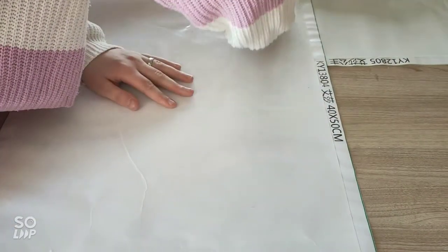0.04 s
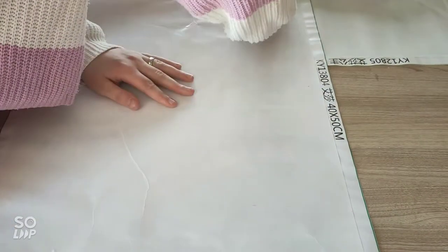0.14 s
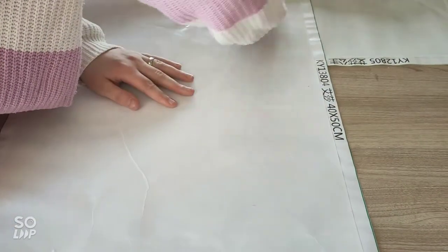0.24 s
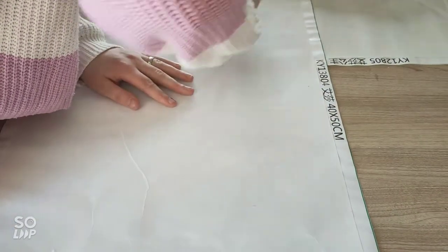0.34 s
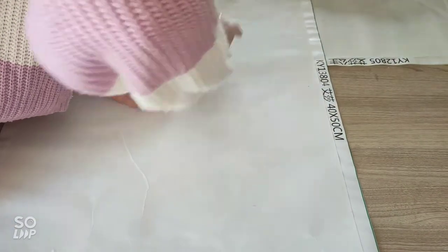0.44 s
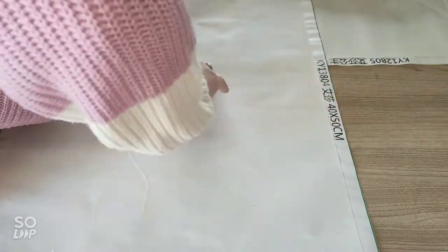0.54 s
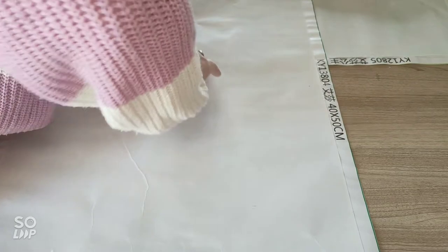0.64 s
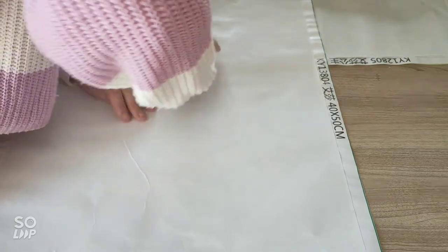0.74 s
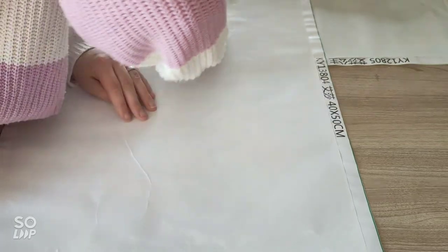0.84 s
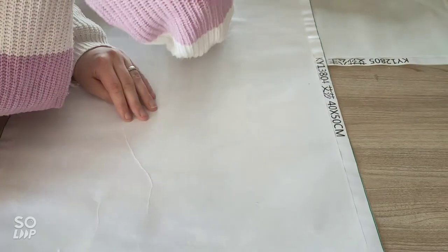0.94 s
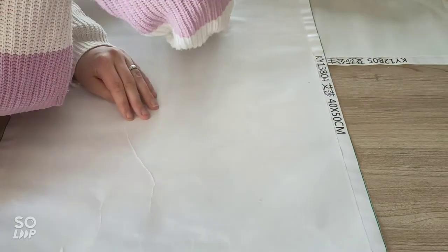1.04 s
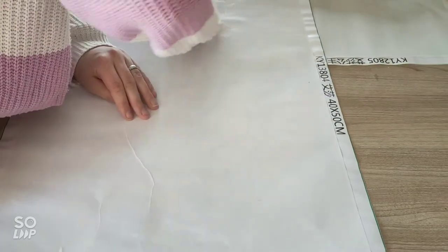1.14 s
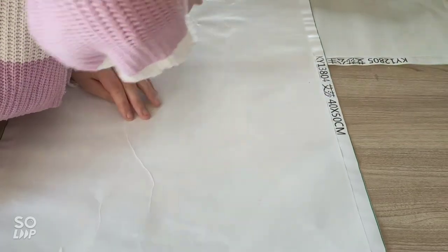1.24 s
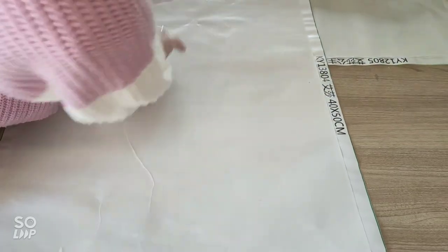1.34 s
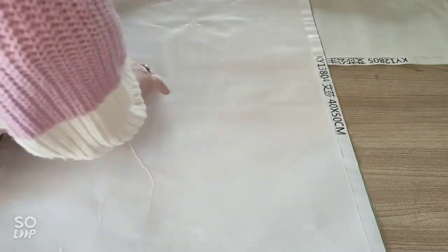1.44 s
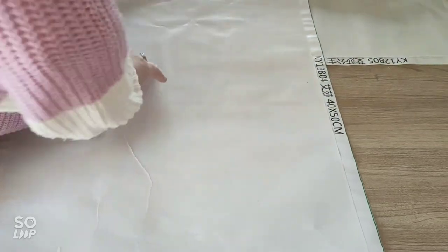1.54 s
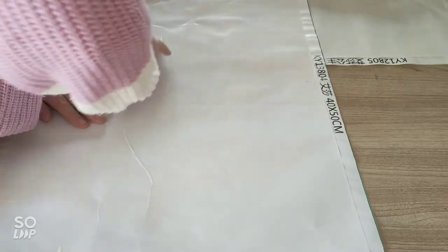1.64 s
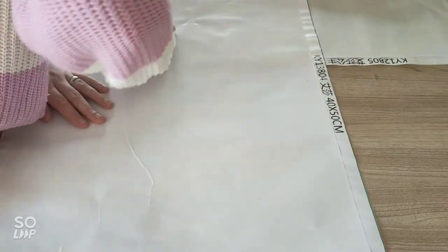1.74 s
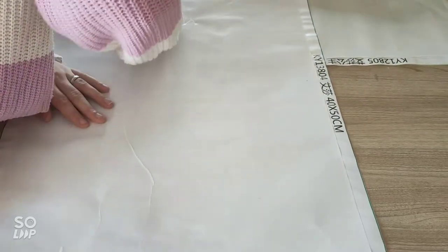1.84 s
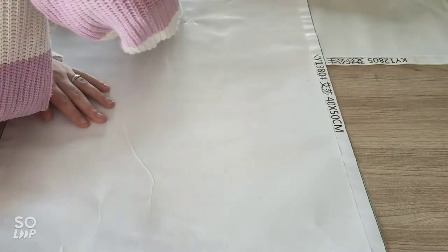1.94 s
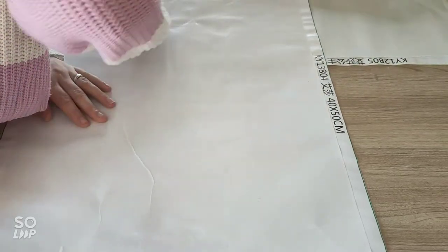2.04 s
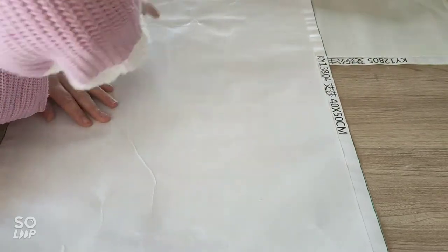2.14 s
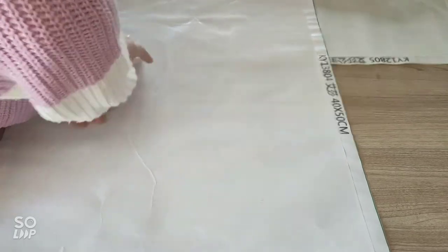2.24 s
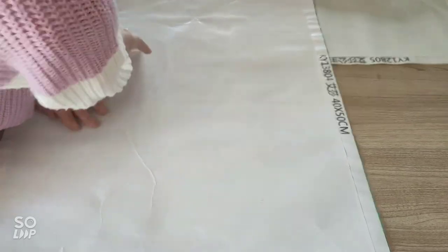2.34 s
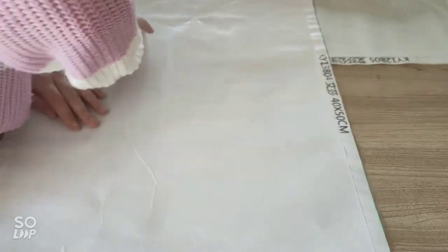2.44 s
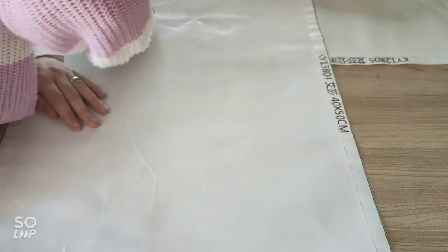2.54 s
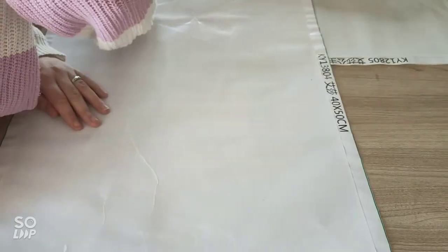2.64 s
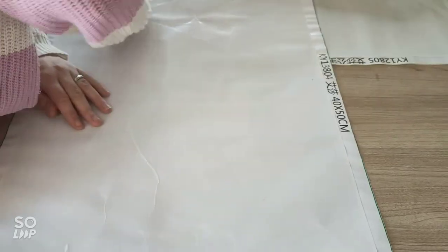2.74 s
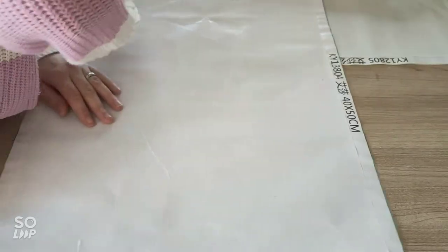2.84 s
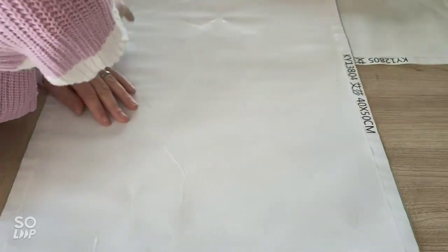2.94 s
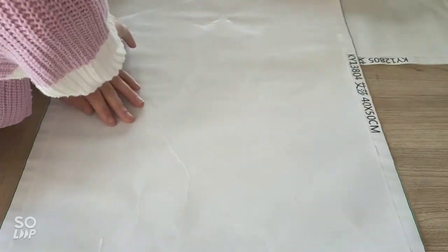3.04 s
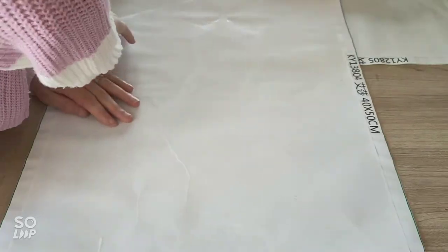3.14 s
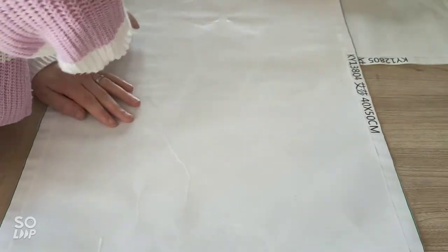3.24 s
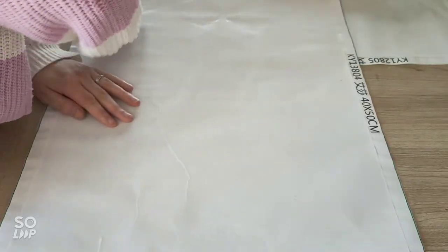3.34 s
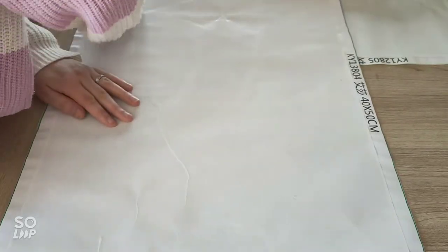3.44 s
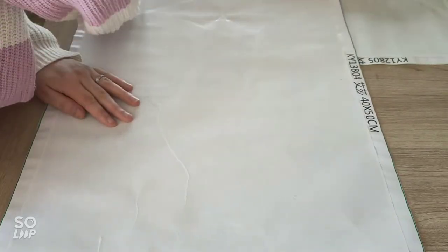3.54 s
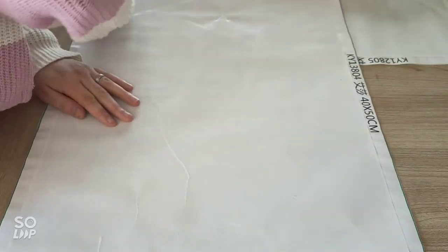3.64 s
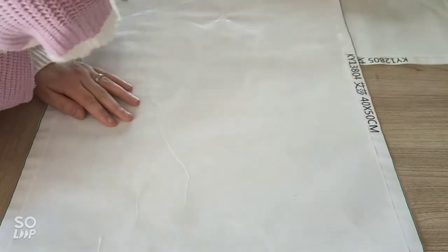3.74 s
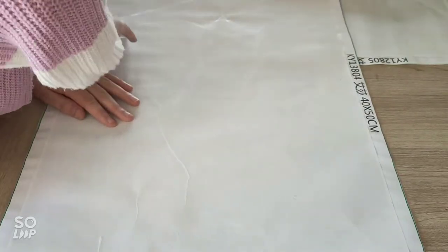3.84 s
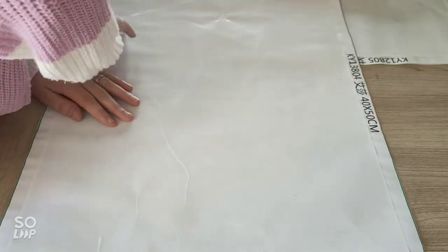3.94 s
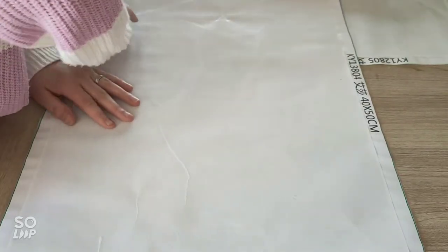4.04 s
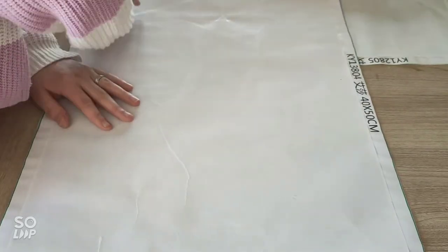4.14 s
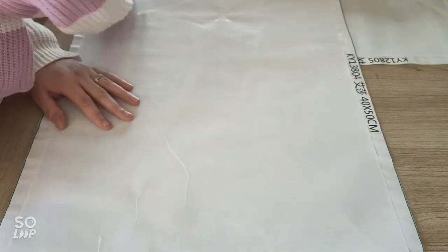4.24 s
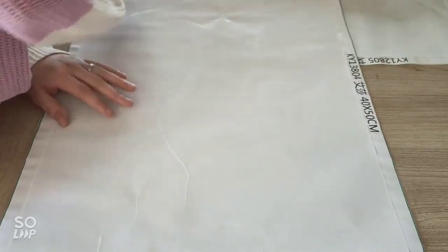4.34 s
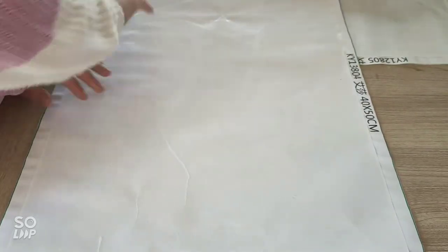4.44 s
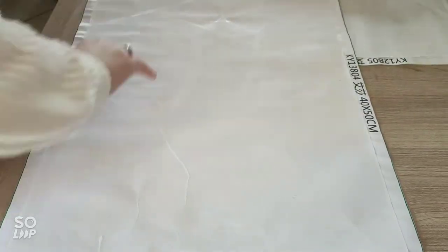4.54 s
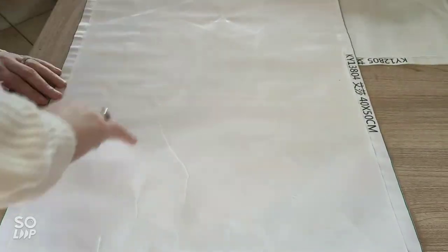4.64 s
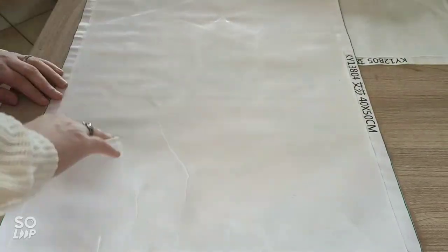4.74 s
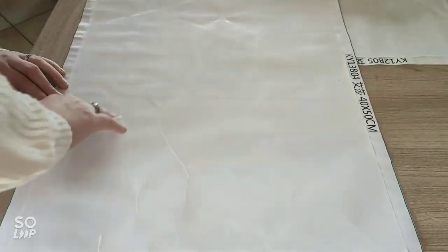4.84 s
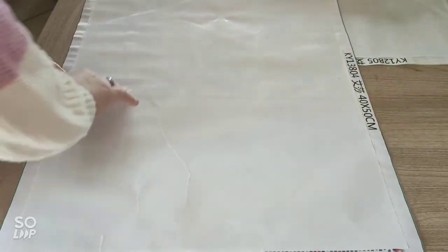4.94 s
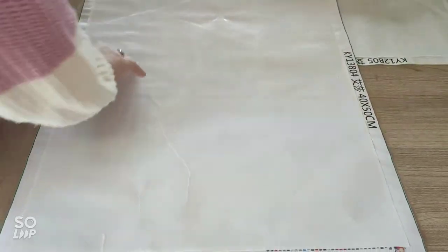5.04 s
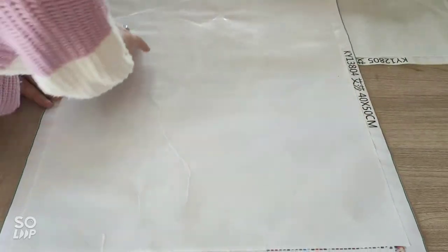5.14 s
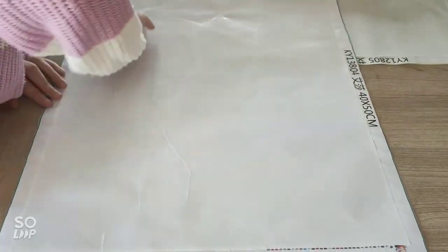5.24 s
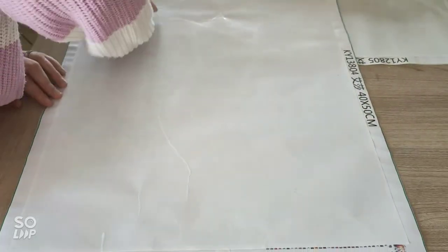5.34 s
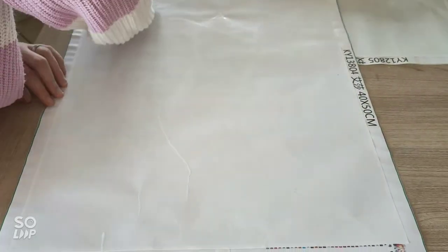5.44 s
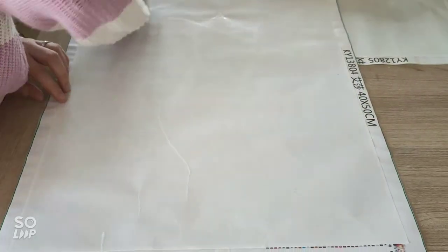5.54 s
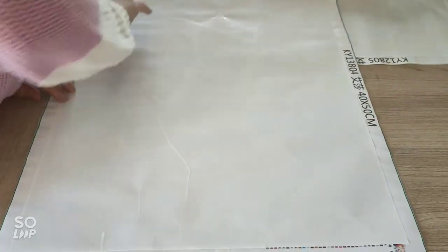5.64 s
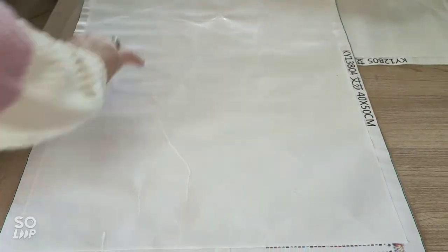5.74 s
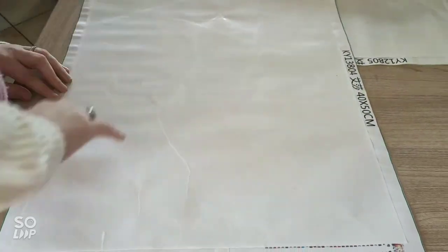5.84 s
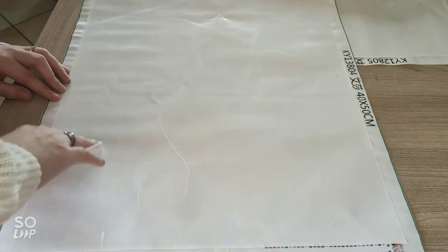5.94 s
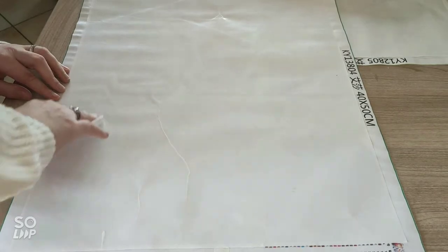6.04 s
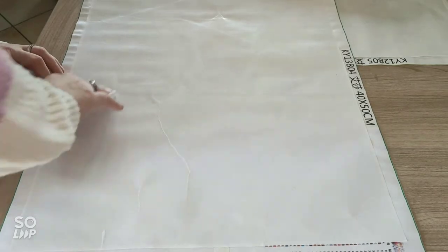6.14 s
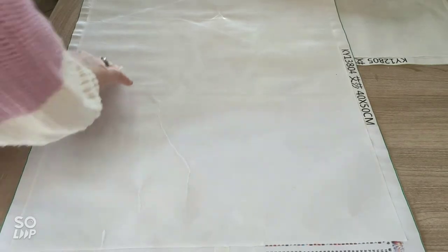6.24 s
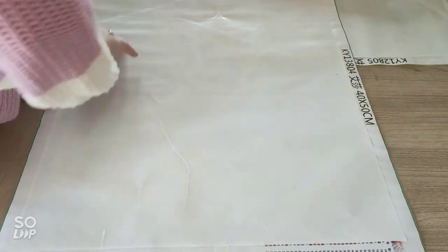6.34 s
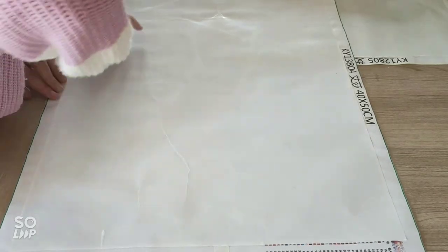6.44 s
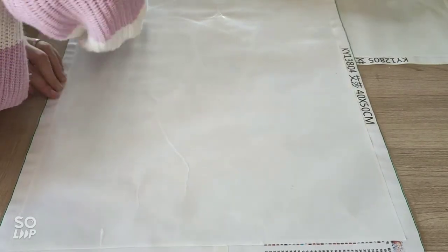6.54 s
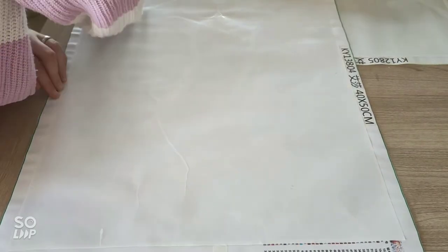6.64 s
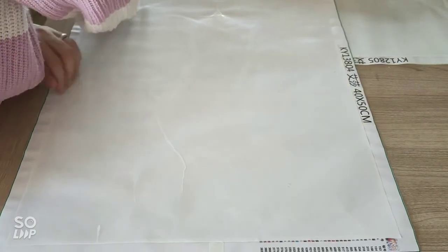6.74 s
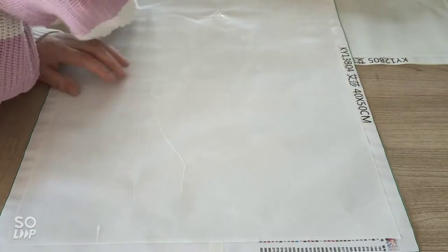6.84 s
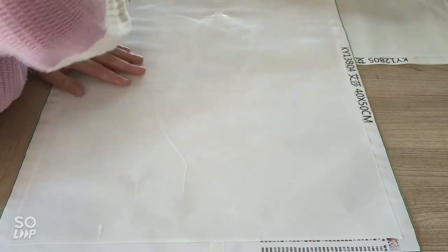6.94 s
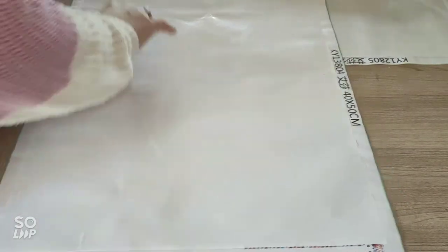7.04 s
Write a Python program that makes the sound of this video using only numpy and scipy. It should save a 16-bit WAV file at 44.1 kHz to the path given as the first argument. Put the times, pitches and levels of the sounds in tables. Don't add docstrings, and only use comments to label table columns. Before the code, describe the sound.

Dry, breathy hand strokes over a crackling sheet, with slaps, sharp crease snaps and low wooden bumps in a quiet room.

```python
import sys
import numpy as np
from scipy import signal
from scipy.fft import rfft, irfft, next_fast_len
from scipy.io import wavfile

SR = 44100
rng = np.random.default_rng(int(sys.argv[2]) if len(sys.argv) > 2 else 0)


def makeup_ratio(level_db):
    decades = np.asarray(level_db, float) / 20
    return 10 ** decades


def to_wav(sig):
    pcm = np.clip(np.atleast_2d(sig), -1, 1) * 32767
    pcm = np.round(pcm).astype(np.int16)
    wavfile.write(sys.argv[1], SR, pcm.T)


N = 312669

# (time [s], crack peak [dB], cupped air [Hz], cupped air [dB], sheet flap [Hz], sheet flap [dB])
LANDINGS = [
    (0.588, -32.5, 553, -38.5, 1700, -35.5),
    (1.48, -31, 534, -47.5, 2460, -68),
    (2.31, -27, 1100, -43, 2010, -32.5),
    (3.0834, -26, 700, -38, 1670, -34.5),
    (3.9107, -17.5, 1530, -31.5, 3040, -31),
    (4.768, -32, 514, -40, 3000, -42),
    (5.977, -38, 490, -43, 1420, -61),
]


def rms_one(x):
    return x / np.sqrt(np.mean(x ** 2) + 1e-20)


def filtered(x, order, hz, kind):
    return signal.sosfilt(signal.butter(order, hz, kind, fs=SR, output="sos"), x)


def at_hz(points, hz):
    curve_hz, values = np.array(points).T
    return np.interp(np.log(hz), np.log(curve_hz), values)


def in_time(rows):
    s, *columns = np.transpose(rows)
    s = np.maximum.accumulate(s)
    return [np.interp(np.arange(N) / SR, s, column) for column in columns]


def drift(rate):
    r = np.exp(-80 * np.pi * rate / SR)
    slow = signal.lfilter([1], [1, -2 * r, r * r], rng.standard_normal(N // 40 + 2002))[2000:]
    return np.interp(np.arange(N) / 40, np.arange(len(slow)), rms_one(slow))


def resonance(x, hz, width_hz):
    r = np.exp(-np.pi * width_hz / SR)
    zeros = np.array([1, 0, -1]) * (1 - r * r) / 2
    return signal.lfilter(zeros, [1, -2 * r * np.cos(2 * np.pi * hz / SR), r * r], x)


def ring(x, hz, t60):
    r, w = makeup_ratio(-60 / (t60 * SR)), 2 * np.pi * hz / SR
    return signal.lfilter([0, np.sin(w)], [1, -2 * r * np.cos(w), r * r], x)


def push(t, length_s):
    return np.where(t < length_s, np.sin(np.pi * t / length_s) ** 2, 1e-18)


def coloured(source, spectrum, patchy_db, lift_db=lambda hz: 0):
    # (frequency [Hz], likeness [0..1])
    likeness = [(60, .99), (250, 0.64), (700, 0.72), (2800, 0.19), (5200, 0.32), (6800, 0.53), (8300, 0.14),
                (11000, 0.095), (13000, 0.45), (15000, 0.7)]
    out, total = 0, 0
    edges = 28 * 2 ** np.arange(0, 9.3, 1 / 3)
    for k, (low, high) in enumerate(zip(edges, edges[1:])):
        hz = np.sqrt(low * high)
        if not spectrum[0][0] < hz < spectrum[-1][0]:
            continue
        mid, side = filtered(source[k % 2], 2, [low, high], "band")
        alike = np.clip(at_hz(likeness, hz), 0, 1)
        level = makeup_ratio(at_hz(spectrum, hz))
        total += level ** 2 * (high - low) / SR * 4
        gain = level * makeup_ratio(patchy_db * drift(15.6) + lift_db(hz))
        out = out + gain * (np.sqrt(1 + alike) * mid + np.sqrt(1 - alike) * side * [[1], [-1]])
    return out / np.sqrt(total)


def spread(pair, side_db, hz):
    mid, side = pair
    side = makeup_ratio(side_db) * filtered(side, 1, hz, "high")
    return mid + side * [[1], [-1]]


def nearer_left(pair):
    left_lead = 7.3
    size = next_fast_len(N + 64)
    phase = np.minimum(np.fft.rfftfreq(size) * left_lead, 2)
    turn = np.exp(-2j * np.pi * phase)
    return np.array([pair[0], irfft(rfft(pair[1], size) * turn, size)[:N]])


def add(out, s, sound, pan_db):
    i = round(s * SR)
    out[:, i:i + sound.shape[-1]] += sound[..., :N - i] * makeup_ratio([[pan_db / 2], [-pan_db / 2]])


def swell(s, length):
    near = slice(max(int((s - 3 * length) * SR), 0), int((s + 3 * length) * SR))
    t = np.arange(N)[near] / SR
    return near, np.exp(-((t - s) / length) ** 2)


def quiet_floor():
    # (frequency [Hz], density [dB per Hz])
    quiet = [(18, -37), (30, 11), (90, -0.5), (244, -12.5), (293, -9.5), (412, -13), (610, -9.5),
             (904, -13.5), (1450, -18.5), (7350, -28), (9060, -17), (12400, -51), (14500, -11),
             (15700, -22)]
    return makeup_ratio(-69) * coloured(rng.standard_normal((2, 2, N)), quiet, 0.74)


def envelope_db(t, full, rise, hold, fall, rise_bend, fall_bend):
    early = np.maximum(full - t, 0) / max(rise, .003)
    late = np.maximum(t - full - hold, 0) / max(fall, .003)
    landing = min([s for s, *rest in LANDINGS if s > full] + [99])
    slopes_db = np.maximum(-20 * (early ** rise_bend + late ** fall_bend), -150)
    return np.where(t < landing, slopes_db, -150)


def stroke_controls():
    # (full speed time [s], rise [s], hold [s], fall [s], skin hiss [dB])
    strokes = [(0.0, 0.11, 0.011, 0.21, -44), (0.731, 0.065, 0.085, 0.23, -49),
               (0.855, 0.15, .15, .14, -47.5), (1.686, 0.12, 0.16, 0.2, -44),
               (2.543, 0.17, 0.085, 0.15, -42), (3.376, 0.2, 0.073, 0.18, -44),
               (4.108, 0.15, 0.088, 0.15, -43), (5.125, .26, 0.057, 0.24, -41),
               (5.339, 0.1, 0.068, 0.2, -47), (6.159, 0.15, 0.073, 0.26, -45.5),
               (6.475, 0.21, 0.066, 0.3, -42)]
    # (skin hiss [Hz], sheet [dB], table [dB], fibres [dB], weight [dB])
    grips = [(6100, -5, -9, -10.5, -60.5), (5900, -9, -11.5, -9, -61), (5900, -1.5, -5, -4, -57.5),
             (7370, -6, -9, -8, -60), (6400, -5, -7.5, -12, -58), (6300, -7, -11, -11, -68),
             (6370, -8, -14.5, -11.5, -68), (6900, -8, -9, -11.5, -59), (6400, -4, -6, -7.5, -61),
             (5120, -5.5, -6.5, -9.5, -63.5), (6100, -9, -13.5, -11, -68)]
    # (time [s], rise [s], fall [s], hiss [dB],
    # sheet against hiss [dB])
    touches = [(0.188, 0.11, 0.0092, -62, 13.5), (0.325, 0.021, 0.054, -59.5, 5.5),
               (.54, 0.19, 0.27, -66, -9), (.856, 0.014, 0.071, -46, 0.5),
               (1.065, 0.048, 0.03, -62.5, 15.5), (1.195, 0.014, 0.092, -51.5, -0.5),
               (1.235, 0.074, 0.11, -49.5, -5.5), (1.455, 0.089, 0.14, -67.5, -1.5),
               (1.48, .012, 0.018, -59, -6), (1.052, .003, .01, -44.5, 5),
               (1.556, 0.0035, 0.0072, -50, 1.5), (6.07, 0.042, 0.12, -52, -2),
               (1.474, .002, .012, -52, -3), (5.84, 0.05, 0.044, -75, -14), (1.508, .004, .01, -43, -10),
               (2.07, 0.037, 0.036, -67.5, 8), (2.12, 0.14, 0.3, -70, -2), (2.94, 0.23, 0.58, -57, -11),
               (3.61, 0.06, 0.056, -69.5, 11.5), (3.693, 0.018, 0.028, -53, -3),
               (3.72, 0.028, 0.075, -65, -1), (4.37, 0.11, 0.087, -63.5, -0.5),
               (4.463, 0.056, 0.073, -68.5, -1), (4.69, 0.15, 0.11, -71, -15), (4.87, 0.073, 0.4, -56, 5.5),
               (5.288, .015, .015, -40, -27), (5.66, 0.11, 0.044, -63.5, -24.5),
               (6.79, .02, 0.084, -52, -7), (6.92, 0.024, 0.06, -56, -4), (7.0, 0.085, 0.038, -63.5, -3),
               (7.08, 0.044, .1, -57, -8)]
    # (time [s], rise [s], fall [s], table drone [dB], palm hollow [Hz])
    presses = [(.2, 0.068, 0.065, -53, 330), (.34, .03, 0.11, -60, 350), (.92, 0.1, 0.089, -51, 453),
               (1.065, 0.047, 0.079, -44, 467), (1.5, 0.039, 0.053, -55, 350),
               (1.22, 0.015, 0.048, -52, 456), (1.56, 0.022, 0.048, -52, 310), (1.92, 0.23, 0.12, -53, 500),
               (2.45, 0.035, .08, -52, 350), (2.66, 0.14, 0.091, -49.5, 423), (3.61, 0.12, 0.067, -51, 420),
               (4.97, 0.16, 0.12, -47, 450), (5.37, 0.11, 0.098, -47, 464), (5.48, 0.12, 0.069, -49.5, 385),
               (6.1, 0.074, 0.13, -48, 342), (6.58, 0.073, 0.053, -60, 350),
               (6.78, 0.061, 0.05, -52.5, 640)]
    # (hiss [dB], sheet [dB], table [dB], fibres [dB], decay [dB per s])
    settles = [(-50.5, 7, 0, -4.5, 170), (-49, -2.5, -8, -6, 131), (-48.5, 8.5, 3, -5.5, 228),
               (-56, 6, -9, -5, 124), (-43, 6.5, -8.5, -9.5, 205), (-55, 9.5, 5, -6, 138),
               (-63, 11, 10.5, -5, 88)]
    rise_bend, fall_bend, touch_bend = 1.94, 2.13, 1.36
    sheet_follows, fibre_follows, weight_follows = 0.7, 1.21, 0.4
    table_wakes, table_follows = 1.5, 0.77
    hiss_sag_hz_per_s, weight_sag_db_per_s = 340, 9
    hollow_start_hz, hollow_opens_hz, hollow_s = 350, 140, 0.068
    touch_hz, touch_hollow_hz, touch_table_db, touch_fibre_db = 7430, 473, -8, -9.5

    t = np.arange(0, N + 32, 32) / SR
    flat = 0 * t
    # hiss dB, then sheet, table and fibres against it, weight dB, hiss Hz, hollow Hz
    moves = [(-84 + flat, 0, 0, -8.0, -83.5, touch_hz, touch_hollow_hz)]
    for (full, rise, hold, fall, db), (hz, sheet_db, table_db, fibre_db, weight_db) in zip(strokes, grips):
        swing_db = envelope_db(t, full, rise, hold, fall, rise_bend, fall_bend)
        along = np.clip(t - full + rise, 0, rise + hold + fall)
        table_share = np.where(t < full, table_wakes, table_follows)
        moves.append((db + swing_db,
                      sheet_db + (sheet_follows - 1) * swing_db,
                      table_db + (table_share - 1) * swing_db,
                      fibre_db + (fibre_follows - 1) * swing_db,
                      weight_db + weight_follows * swing_db - weight_sag_db_per_s * (along - rise),
                      hz - hiss_sag_hz_per_s * (along - rise),
                      hollow_start_hz + hollow_opens_hz * np.tanh(along / hollow_s / 2)))
    for s, rise, fall, db, sheet_db in touches:
        touch_db = db + envelope_db(t, s, rise, 0, fall, touch_bend, touch_bend)
        moves.append((touch_db, sheet_db, sheet_db + touch_table_db, touch_fibre_db, -150,
                      touch_hz, touch_hollow_hz))
    for s, rise, fall, db, hz in presses:
        drone_db = db + envelope_db(t, s, rise, 0, fall, touch_bend, touch_bend)
        moves.append((flat - 150, 0, 150 + drone_db, 0, -150, touch_hz, hz))
    for (s, *rest), (db, sheet_db, table_db, fibre_db, dies_db) in zip(LANDINGS, settles):
        dying_db = np.maximum(db - dies_db * (t - s - .012), -150)
        moves.append((np.where(t > s + .002, dying_db, -150), sheet_db, table_db, fibre_db, -150,
                      touch_hz, touch_hollow_hz))

    columns = [np.array([move[k] + flat for move in moves]) for k in range(7)]
    hiss_db, sheet_db, table_db, fibre_db, weight_db, hz, hollow_hz = columns
    hiss, weight = makeup_ratio(2 * hiss_db), makeup_ratio(2 * weight_db)
    sheet, table, fibre = [makeup_ratio(2 * (hiss_db + db)) for db in (sheet_db, table_db, fibre_db)]
    all_hiss = hiss.sum(0)
    ratios = [all_hiss, sheet.sum(0) / all_hiss, table.sum(0) / all_hiss, fibre.sum(0) / all_hiss, weight.sum(0)]
    levels = [10 * np.log10(ratio) for ratio in ratios]
    pitches = [(hiss * hz).sum(0) / all_hiss, (table * hollow_hz).sum(0) / table.sum(0)]
    return in_time(np.transpose([t] + levels + pitches))


def grit(per_s, spread_db):
    sizes = makeup_ratio(spread_db * np.minimum(rng.exponential(1, N), 4))
    born = rng.random(N) < per_s / SR
    return rms_one(rng.standard_normal((2, 2, N)) * (.5 + sizes * born))


def mode_bank(drive, modes, centre_hz, octaves, wander_db):
    total, power = 0, 0
    for k, (hz, width_hz, db) in enumerate(modes):
        weight = makeup_ratio(db - 4.34 * (np.log2(hz / centre_hz) / octaves) ** 2)
        sound = (-1) ** k * makeup_ratio(wander_db * drift(6.2)) * rms_one(resonance(drive, hz, width_hz))
        total = total + weight * sound
        power = power + weight ** 2
    return total / np.sqrt(power)


def slide():
    # (frequency [Hz], density [dB per Hz])
    sheet_spectrum = [(410, -32), (700, -25.5), (850, -10.5), (1010, -7), (2220, -6.5), (2770, -2.5),
                      (4410, -4), (6340, 1.5), (8540, -8), (13400, -15.5), (15500, -21)]
    # (frequency [Hz], width [Hz], level [dB])
    top_modes = [(223, 48, 1), (320.3, 46, -1.5), (382, 32, -5), (487, 54, -4.5), (560, 23, -8),
                 (616, 53, -5.5), (719.7, 15, -7.5), (788, 40, -7)]
    # (frequency [Hz], width [Hz], level [dB])
    frame_modes = [(59.4, 19, -8), (93.6, 13, -8.5), (131.9, 6.3, -0.5), (184.5, 23, -1.5)]
    hiss_db, sheet_db, table_db, fibre_db, weight_db, centre_hz, hollow_hz = stroke_controls()
    pressure_db = hiss_db + 0.39 * drift(25)
    boom_db = sheet_db + 5.0
    fibre_lift_db = fibre_db + 9.0

    def lift_db(hz):
        if hz < 4300:
            return boom_db * (1 + 0.3 * np.log2(2200 / hz))
        if hz > 8500:
            return fibre_lift_db
        return -3.0

    friction = grit(1500, 2.1)
    paper = nearer_left(coloured(friction, sheet_spectrum, 0.97, lift_db))
    ridges = [(hz, 380.0, 0) for hz in np.arange(4800, 8200, 330)]
    skin = spread(mode_bank(friction[0], ridges, centre_hz, 0.14, .9), -16.0, 500)
    skin = makeup_ratio(-4.0 - 0.49 * np.clip(boom_db, -6, 6)) * skin
    shake = rng.standard_normal((2, N))
    drone = nearer_left(spread(mode_bank(shake, top_modes, hollow_hz, 0.69, 2.4), -8.0, 360))
    drone = makeup_ratio(hiss_db + table_db - 2.0) * drone
    frame = makeup_ratio(weight_db + 0.7) * spread(mode_bank(shake, frame_modes, 130, 3.3, 2.6), -12.0, 300)
    return makeup_ratio(pressure_db + 3.5) * (paper + skin) + drone + frame


def brushes():
    # (time [s], length [s], level [dB], centre [Hz])
    noise_swells = [(0.464, 0.056, -64, 1020), (0.45, 0.07, -68.5, 4400), (1.447, 0.017, -62.5, 5000),
                    (4.465, 0.056, -70.5, 5000), (6.36, 0.25, -54, 4700), (5.38, 0.12, -55, 1050),
                    (1.856, 0.064, -54.5, 604), (1.204, 0.031, -53, 2350), (1.065, 0.0084, -46.5, 1030),
                    (1.45, 0.04, -64, 980), (3.602, 0.046, -56, 950), (4.463, 0.07, -70, 980),
                    (6.775, 0.018, -55, 1050), (6.78, .03, -58, 650), (6.93, 0.022, -76, 890),
                    (0.05, 0.099, -48, 3380), (.72, 0.044, -52, 3200), (0.784, .04, -53, 3200),
                    (0.97, 0.061, -53, 3020), (2.95, 0.1, -66.5, 2000), (2.96, 0.074, -62, 3900),
                    (3.115, 0.026, -53, 850), (3.165, 0.018, -56, 880), (3.14, .04, -56, 1900),
                    (4.18, .08, -56, 3100), (1.8, .1, -58, 1100), (3.695, 0.01, -50, 6800),
                    (6.29, 0.08, -48, 7100), (6.6, 0.066, -62, 1330), (0.167, .012, -56, 2300),
                    (6.2, .03, -55.5, 640), (3.1, 0.024, -55, 1900), (3.96, 0.033, -51, 4900),
                    (4.3, 0.045, -58, 3040), (4.8, 0.022, -49, 2900), (6.13, 0.065, -55, 2940)]
    out = np.zeros((2, N))
    noise = rng.standard_normal((2, N))
    for s, length, db, hz in noise_swells:
        near, bell = swell(s, length)
        hollow = resonance(noise[:, near], hz, 0.2 * hz ** .5 * 33)
        hollow = resonance(hollow, hz, 0.56 * hz)
        out[:, near] += makeup_ratio(db) * bell * rms_one(hollow)
    return spread(out, -4.0, 300)


def bumps():
    # (time [s], peak [dB], frequency [Hz])
    fingers = [(0.167, -41, 217), (0.19, -49, 125), (0.32, -51, 209), (0.738, -38, 129), (0.897, -40, 150),
               (0.927, -46, 95), (0.959, -44, 170), (.865, -38, 600), (.901, -40, 400), (.927, -40, 362),
               (.965, -44, 230), (0.741, -44, 334), (.48, -65, 220), (1.478, -41, 300), (2.8, -55.5, 220),
               (4.9, -46, 200), (6.64, -54, 500), (1.048, -40, 550), (1.075, -41, 430), (1.571, -52, 102),
               (2.5, -57, 126), (1.047, -43.5, 123), (3.16, -52, 60), (1.549, -43, 128), (2.43, -53, 133),
               (3.596, -47.5, 296), (4.442, -69, 91.5), (4.838, -42, 61), (5.455, -48, 299),
               (6.063, -44, 267), (6.765, -49, 141), (6.989, -54, 58.6)]
    out, t = np.zeros((2, N)), np.arange(SR // 3) / SR
    for s, peak_db, hz in fingers:
        finger = ring(push(t, min(.006, 0.8 / hz)), hz, 9.1 / hz)
        add(out, s, makeup_ratio(peak_db) * finger / abs(finger).max(), 0)
    return out


def snaps():
    # (time [s], peak [dB], centre [Hz], body [dB], left over right [dB])
    creases = [(0.2858, -50, 5780, -60, -1.0), (0.3188, -49, 4840, -59, -3), (0.333, -40, 4600, -51, 0.0),
               (0.854, -22, 6100, -35.5, -4), (0.902, -29, 5000, -42, 1), (1.2128, -22.5, 5500, -40, 2),
               (1.2174, -19.5, 6400, -41, 4), (1.4712, -41, 4960, -50, 6), (1.5055, -30, 6960, -55, 1.0),
               (1.553, -41, 6260, -50, 2.5), (1.87, -28, 6960, -42, 0), (3.685, -51, 6460, -54, 0),
               (5.2846, -30.5, 5900, -61, -11), (6.752, -29, 6100, -60, 5), (6.938, -45, 6800, -52, 1.5)]
    out, t = np.zeros((2, N)), np.arange(SR // 40) / SR
    for s, peak_db, hz, body_db, pan_db in creases:
        burst = rng.standard_normal(len(t)) * (np.exp(-t / 0.00049) + 0.12 * np.exp(-t / 0.004))
        click = resonance(burst, hz, 0.32 * hz) + 0.24 * np.diff(burst, prepend=0)
        body = resonance(burst, 1200, 2600)
        snap = makeup_ratio(peak_db) * click / abs(click).max()
        snap = snap + makeup_ratio(min(body_db + 8.5, peak_db - 4.0)) * body / abs(body).max()
        add(out, s + 0.0008, snap, pan_db)
    return out


def thumps():
    # (frequency [Hz], level [dB], t60 [s])
    palm_modes = [(67, -5, 0.13), (89, -2.5, 0.096), (126.6, -4, 0.15), (224, -8, 0.051), (300, -12, .04),
                  (430, -16, .03)]
    # (time [s], peak [dB])
    palms = [
        (0.587, -32.5),
        (1.477, -39.5),
        (2.309, -35.5),
        (3.081, -40.5),
        (3.907, -34.5),
        (4.767, -35.5),
        (5.978, -44),
    ]
    out, t = np.zeros((2, N)), np.arange(SR // 3) / SR
    palm = sum(makeup_ratio(db) * ring(push(t, .006), hz, t60) for hz, db, t60 in palm_modes)
    for s, thump_db in palms:
        add(out, s + 0.005, makeup_ratio(thump_db + 3.0) * palm / abs(palm).max(), 0)
    return out


def slaps():
    # (knock of sheet on wood [dB], contact [s], rattle [dB], rattle decay [s], left over right [dB])
    knocks = [(-31, 0.00446, -16, 0.027, 3.5), (-48, 0.0019, -14, .02, 1.5),
              (-28.5, 0.005, -11.5, 0.038, 2), (-31.5, 0.0031, -11.5, 0.037, 2),
              (-26.5, 0.0036, -11.5, 0.031, 1.5), (-31.5, 0.0049, -14, 0.028, 3),
              (-43, 0.0037, -9, 0.028, 3)]
    # (centre [Hz], fine top crackle [dB])
    cracks = [(5000, -38), (5500, -46), (6500, -37), (5700, -36), (6040, -31), (6460, -44), (7000, -52)]
    out, t = np.zeros((2, N)), np.arange(SR // 4) / SR
    for landing, knock, (crack_hz, top_db) in zip(LANDINGS, knocks, cracks):
        s, crack_db, cup_hz, cup_db, flap_hz, flap_db = landing
        body_db, contact_s, rattle_db, rattle_s, pan_db = knock
        contact = np.minimum(t / (0.47 * contact_s), 1) ** 2
        contact = contact * np.exp(-np.maximum(t - contact_s, 0) / 0.00047)
        rattle = contact + makeup_ratio(rattle_db) * np.exp(-t / rattle_s) * (t > .8 * contact_s)
        noise = rng.standard_normal((3, 1, len(t))) + 0.64 * rng.standard_normal((3, 2, len(t)))
        crack = filtered(noise[0] * contact, 3, [crack_hz / 1.35, crack_hz * 1.4], "band")
        cup = resonance(noise[1] * rattle, cup_hz, 0.28 * cup_hz)
        flap = resonance(noise[2] * rattle, flap_hz, 0.17 * flap_hz)
        body = filtered(noise[0, :, ::-1] * rattle, 2, [650, 3200], "band")
        top = filtered(noise[1] * contact, 3, 9500, "high")
        parts = [(crack_db, crack), (cup_db + 9.0, cup), (flap_db + 8.5, flap), (body_db + 5.0, body), (top_db, top)]
        slap = sum(makeup_ratio(db) * part / abs(part).max() for db, part in parts)
        add(out, s - .0007, slap, pan_db)
    return out


def sings():
    # (time [s], length [s], level [dB], frequency [Hz])
    catches = [(.869, 0.033, -56, 511), (.937, .028, -55.5, 430), (1.722, 0.021, -56, 322),
               (1.773, .042, -54.5, 134), (1.843, 0.021, -53.5, 591), (1.938, 0.054, -57.5, 473),
               (2.469, 0.036, -57, 317.6), (2.513, 0.074, -53.5, 129), (2.628, .019, -57, 366),
               (2.668, 0.028, -53, 467), (3.438, 0.04, -56.5, 479.4), (4.956, .039, -51.5, 322),
               (4.966, .021, -53.5, 409), (5.009, 0.017, -51.5, 624), (5.076, 0.025, -55.5, 479),
               (5.127, .034, -55, 134), (5.154, 0.028, -56.5, 274), (5.351, 0.023, -47.5, 473),
               (5.438, 0.024, -52, 483), (5.475, .018, -49, 366), (6.09, .031, -53.5, 322),
               (6.193, .021, -54, 419), (6.42, .06, -59, 501), (6.564, .034, -57.5, 333),
               (6.654, .028, -56.5, 479)]
    out, t = np.zeros(N), np.arange(N) / SR
    wobble = 0.5 * drift(20)
    starts = rng.uniform(0, 2 * np.pi, len(catches))
    for (s, length, db, hz), start in zip(catches, starts):
        near, bell = swell(s, length)
        out[near] += makeup_ratio(db + 4.0) * bell * np.sin(2 * np.pi * hz * t[near] + start + wobble[near])
    return out


def room(x):
    t60_s, wall_cut_hz = 0.39, 4200
    size = next_fast_len(N + SR)
    hz = np.fft.rfftfreq(size, 1 / SR)
    turn = np.exp(-2j * np.pi * hz / SR)
    t60 = t60_s / (1 + hz / wall_cut_hz)
    lags = (rng.uniform(.004, .022, (2, 8)) * SR).astype(int)
    out = []
    for side in lags:
        loops = [makeup_ratio(-60 * lag / SR / t60) * turn ** lag for lag in side]
        h = sum((-1) ** k * g / (1 - g) for k, g in enumerate(loops))
        for lag in rng.integers(40, 200, 3):
            h = h * (turn ** lag - .6) / (1 - 0.5 * turn ** lag)
        out.append(irfft(h * rfft(x, size), size)[:N])
    return np.array(out)


def scene():
    # (time [s], left over right [dB])
    place = [(0, -1.5), (.5, -2), (1.2, -1), (2.5, -0.8), (4.2, 0), (5.2, -0.4), (7.09, -0.7)]
    rub = slide() + nearer_left(brushes() + sings())
    hits = snaps() + slaps()
    echo = filtered(room(hits.mean(axis=0) + rub.mean(axis=0)), 2, 600, "high")
    place_db, = in_time(place)
    direct = (rub + hits) * makeup_ratio(place_db * [[.5], [-.5]])
    return direct + makeup_ratio(-18.5) * echo + bumps() + thumps() + quiet_floor()


def low_pass(x):
    return signal.sosfilt(signal.butter(12, 16520, fs=SR, output="sos"), x)


def record(dry):
    # (frequency [Hz], left over right [dB])
    lean_curve = [(60, .1), (250, .5), (1000, 1.2), (2200, 1.2), (5000, 4.2), (6300, 4.4), (8600, 1.2),
                  (12400, -2.5), (14500, .3)]
    # (frequency [Hz], width [Hz], level [dB])
    port = (4910, 214, 5.44)
    size = next_fast_len(N + 4096)
    lean = makeup_ratio(at_hz(lean_curve, np.fft.rfftfreq(size, 1 / SR) + 1) / 2)
    x = irfft(rfft(dry, size) * [lean, 1 / lean], size)[:, :N]
    port_hz, port_width_hz, port_db = port
    x = x + (makeup_ratio(port_db) - 1) * resonance(x, port_hz, port_width_hz)
    self_noise = filtered(rng.standard_normal((2, N)), 8, 14200, "high")
    x = x + makeup_ratio(-65.5) * spread(self_noise, -4.0, 300)
    x = filtered(x, 4, 52, "high")
    x = signal.sosfilt(signal.cheby2(16, 40, 15850, fs=SR, output="sos"), x)
    return low_pass(x)


dry = scene()
out = record(dry)
to_wav(out)
```